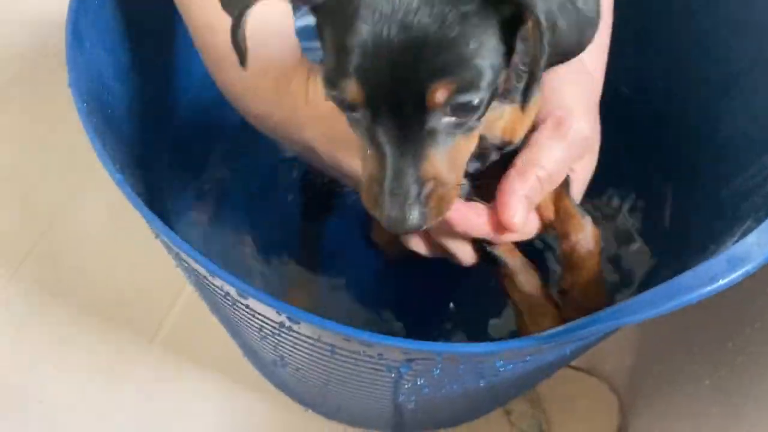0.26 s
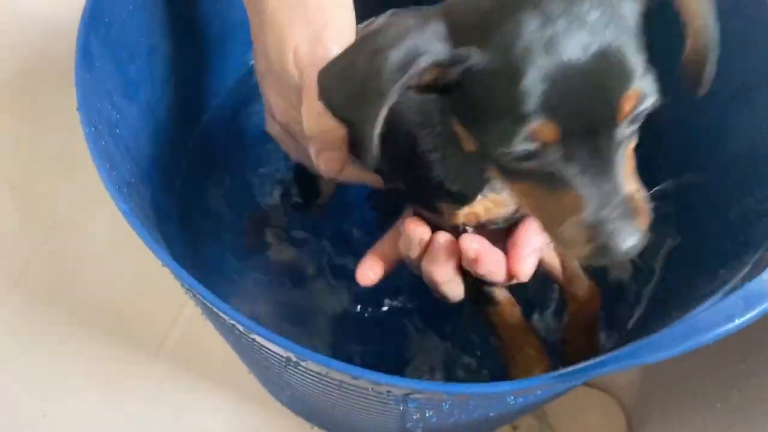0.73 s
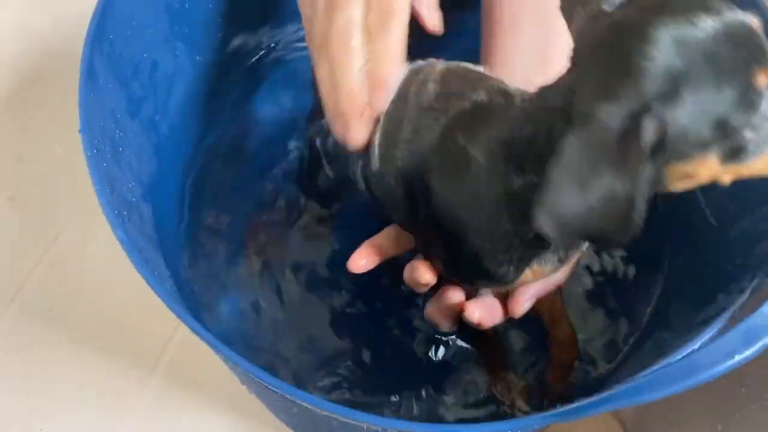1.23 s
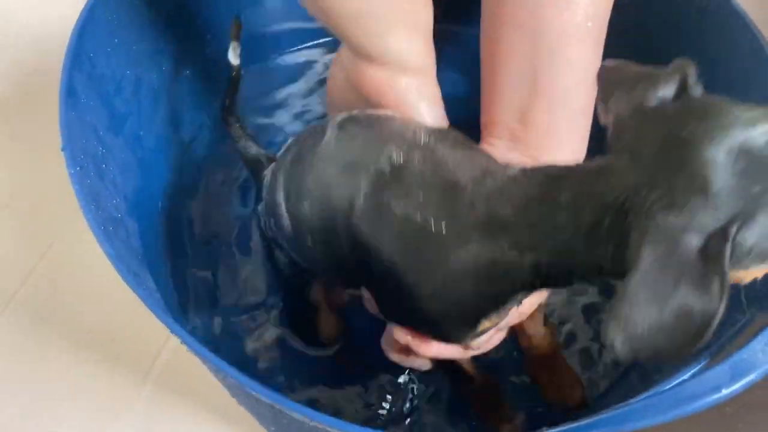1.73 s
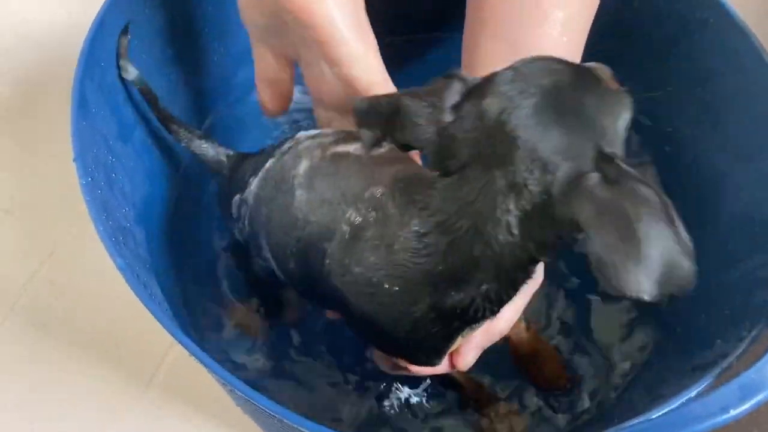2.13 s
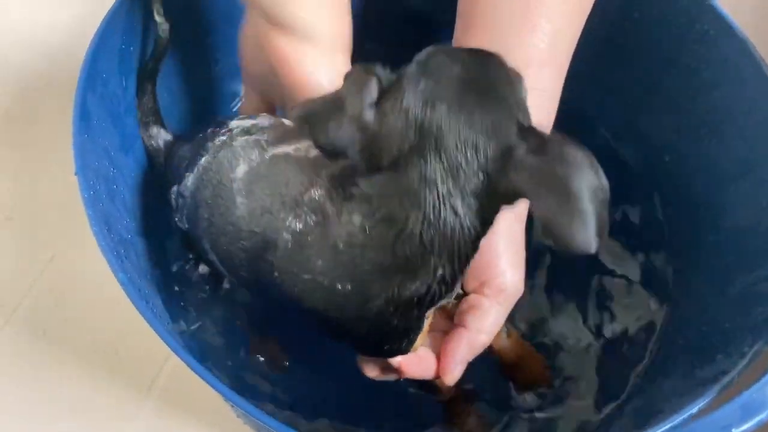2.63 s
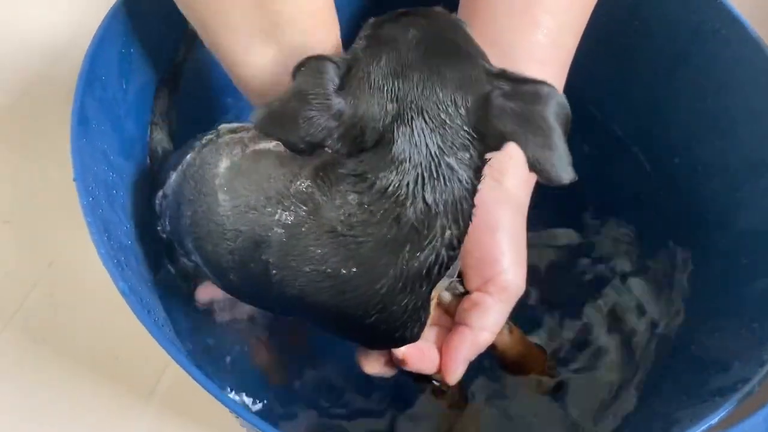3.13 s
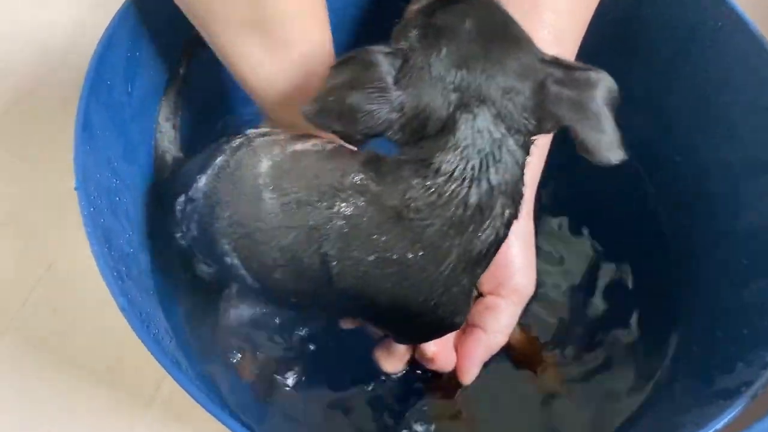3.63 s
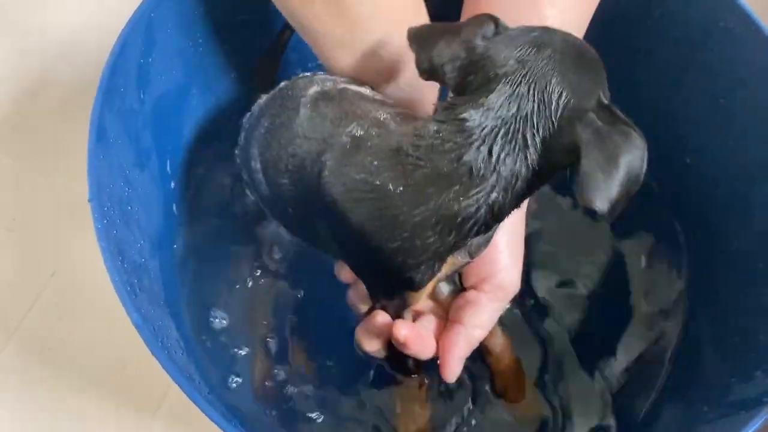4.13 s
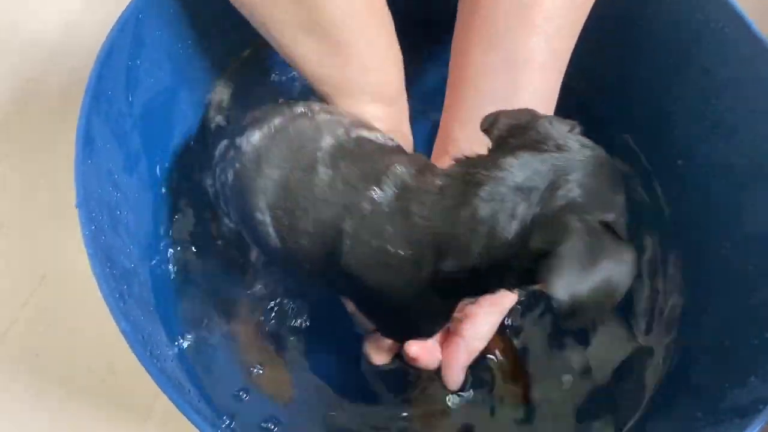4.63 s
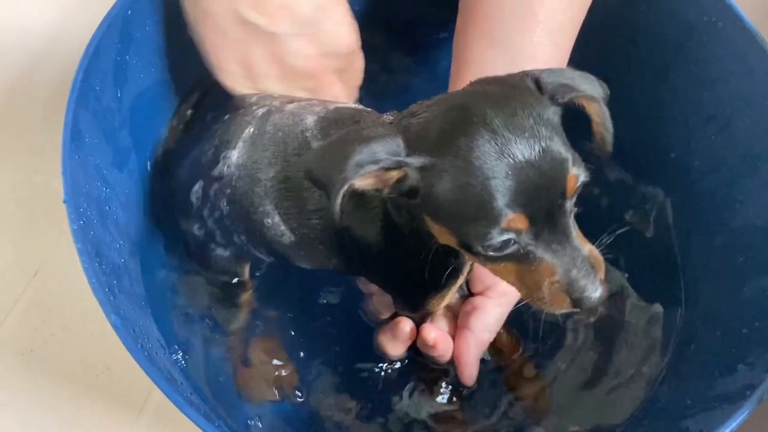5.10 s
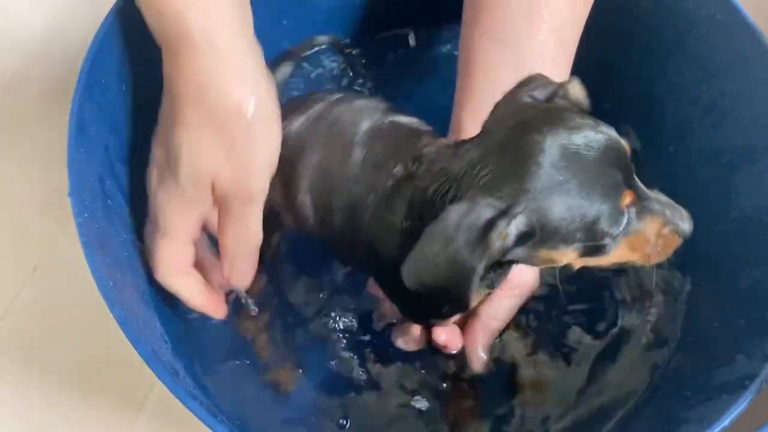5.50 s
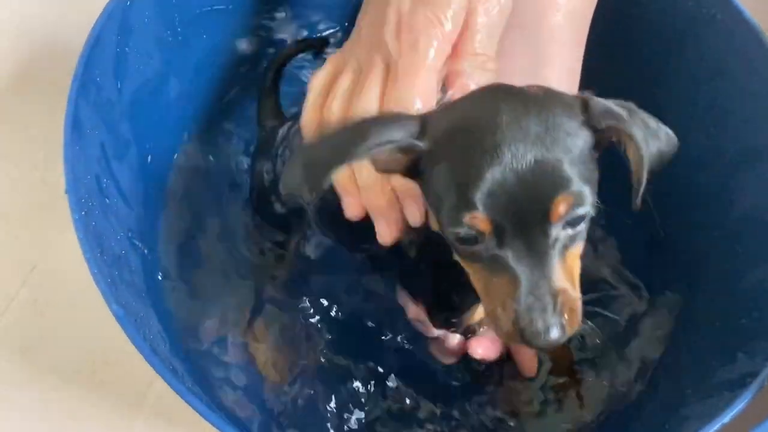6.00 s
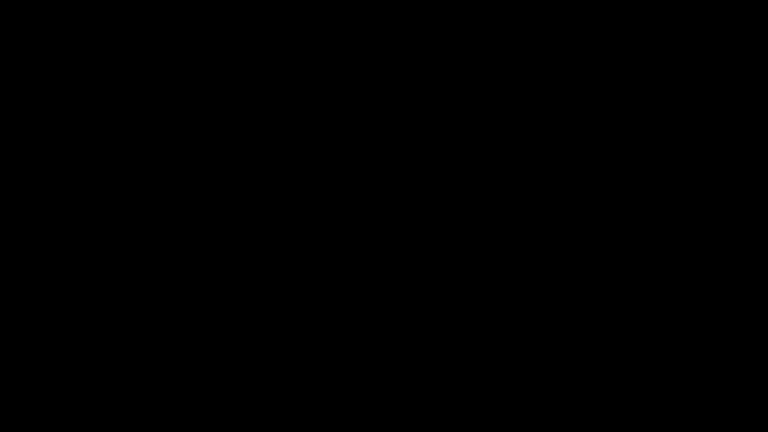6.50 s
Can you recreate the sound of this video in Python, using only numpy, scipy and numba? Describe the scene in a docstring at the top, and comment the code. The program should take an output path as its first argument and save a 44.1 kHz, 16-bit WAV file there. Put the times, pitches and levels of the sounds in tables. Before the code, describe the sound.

Close stereo sound of a small dog being hand-washed in a plastic tub in a small hard room. Soft sloshing and sparse little slaps come first, then a sharper splash midway, rubbing of wet fur, one plastic knock and a denser run of splashes and bubbling plops. A faint low hum lies beneath, and the sound cuts off abruptly.

```python
"""A small hard room: a small dog is washed by hand in a plastic tub of shallow water, heard close up.
Hands and paws slap the water as noise bursts with a froth of tones; trapped bubbles ring as gliding sines.
Swarms of tiny tones make the sloshing, the trickling and the crackle of wet fur; the tub takes one knock,
built from decaying modes. Filtered noise makes the tub wall boom softly as the water shifts.
A wavering mains hum and faint room noise lie underneath."""
import sys
import numpy as np
from scipy import signal
from scipy.fft import rfft, irfft, next_fast_len
from scipy.io import wavfile
from scipy.ndimage import uniform_filter1d
from numba import njit

SR = 44100
rng = np.random.default_rng(int(sys.argv[2]) if len(sys.argv) > 2 else 0)


def store_wav(level_fs):
    """Save 16-bit WAV to argv[1]."""
    pcm = np.round(np.clip(np.atleast_2d(level_fs), -1, 1) * 32767)
    wavfile.write(sys.argv[1], SR, pcm.T.astype(np.int16))


N = 297746
TIME = np.arange(N) / SR


def undb(db):
    """Decibels to gain."""
    return 10 ** (np.asarray(db) / 20)


def unit(x):
    """Scale to rms 1."""
    return x / np.sqrt(np.mean(x ** 2))


def colour(x, points):
    """Filter by a spectrum of (Hz, dB) points, joined over log frequency."""
    hz, db = np.transpose(points)
    size = next_fast_len(len(x))
    f = np.maximum(np.fft.rfftfreq(size, 1 / SR), 1)
    gain = undb(np.interp(np.log(f), np.log(hz), db))
    return irfft(rfft(x, size) * gain, size)[:len(x)]


def band(x, points):
    """Colour x, fall 40 dB in the octave beyond each end, and scale to rms 1."""
    (low, low_db), (high, high_db) = points[0], points[-1]
    return unit(colour(x, [(low / 2, low_db - 40), *points, (high * 2, high_db - 40)]))


def add(out, s, x):
    """Mix x into out from time s in seconds."""
    i = max(int(s * SR), 0)
    out[i:i + len(x)] += x[:max(N - i, 0)]


def walk(rate):
    """Slow random drift at rms 1, with a new target rate times a second."""
    k = int(SR / rate)
    steps = np.repeat(rng.standard_normal(N // k + 1), k)
    return unit(uniform_filter1d(steps, k)[:N])


def track(rows):
    """Join rows (s, value) by straight lines."""
    return np.interp(TIME, *np.transpose(rows))


def swells(rows, attack_s, release_s):
    """Gain over time for rows (s, length, dB): each rises, holds and dies away; overlaps add in power."""
    power, t = np.zeros(N), np.arange(2 * SR) / SR
    for s, length, db in rows:
        rise = np.minimum(t / attack_s, 1)
        fall = np.exp(-np.maximum(t - length, 0) / release_s)
        add(power, s, (undb(db) * rise * fall) ** 2)
    return np.sqrt(power)


@njit
def ring(length, start, hz, size, decay, rise):
    """Damped bubble tones whose pitch glides by rise octaves per s, climbing as they near the surface."""
    out = np.zeros(length)
    for k in range(len(start)):
        first, phase, gain, f = max(int(start[k] * SR), 0), 0., size[k], hz[k]
        fade, climb = np.exp(-1 / (decay[k] * SR)), 2 ** (rise[k] / SR)
        for i in range(first, min(first + int(5 * decay[k] * SR), length)):
            out[i] += gain * np.sin(phase) * min(phase / 5, 1.)
            phase += 2 * np.pi * f / SR
            f *= climb
            gain *= fade if f < 1.8 * hz[k] else .99  # it bursts on reaching the surface
    return out


def swarm(count, low_hz, high_hz, cycles, spread_db, wash):
    """Countless small bubbles of uneven size over a wash of ones too small to tell apart."""
    when, pitch, strength, length, glide = rng.random((count, 5)).T
    hz = low_hz * (high_hz / low_hz) ** pitch
    decay = cycles * (.5 + length) / hz
    size = undb(spread_db * np.minimum(-np.log(1 - strength), 4))  # many weak, few strong
    grains = ring(N, when * N / SR, hz, size, decay, 0.13 * glide / decay)
    return unit(grains) + wash * rng.standard_normal(N)


# Slaps of hands and paws on the water. Each row: start in seconds, splatter and ring level in dB,
# cavity pitch in Hz, spray level in dB; the levels are taken before the gains of slaps().
SLAPS = [(.109, -56, 5470, -64), (.165, -40, 1010, -63), (.439, -51, 2000, -58), (.516, -51, 640, -61),
         (.604, -45, 3920, -73), (.927, -26.5, 4230, -47), (.986, -39.5, 3840, -55), (1.04, -35, 2410, -59),
         (1.506, -38.5, 5700, -75), (1.703, -35, 7400, -51), (1.92, -35, 927, -57),
         (2.053, -43, 1230, -64.5), (2.084, -32.5, 1075, -78), (2.217, -45.5, 2370, -53.5),
         (2.292, -44.5, 1180, -66), (2.788, -39, 4750, -56.5), (3.079, -37, 1083, -47),
         (3.185, -30.5, 4300, -56), (3.259, -42.5, 600, -56.5), (3.452, -43, 1130, -50),
         (3.544, -40, 6660, -58), (3.582, -38, 2230, -54), (3.612, -22.5, 1167, -42.5),
         (3.627, -26, 2900, -55), (3.65, -27, 1600, -67), (3.681, -25, 5350, -46),
         (3.735, -41, 1080, -46.5), (3.778, -32.5, 1044, -58), (4.207, -50, 7350, -58),
         (4.498, -29.5, 893, -64), (4.672, -44, 2000, -49.5), (4.716, -31, 1253, -61),
         (4.765, -26, 1144, -65), (5.101, -28.5, 2720, -37), (5.153, -45.5, 4240, -31.5),
         (5.201, -44, 880, -42), (5.353, -34.5, 1980, -48.5), (5.384, -37, 2510, -51),
         (5.476, -25.5, 2330, -52), (5.652, -29, 4040, -61), (5.7, -31.5, 7900, -54),
         (5.838, -29.5, 1310, -48.5), (5.899, -40, 1690, -46), (6.019, -17, 3030, -29.5),
         (6.023, -20.5, 2920, -35), (6.046, -30.5, 844, -48), (6.11, -21.5, 1046, -33.5),
         (6.252, -29.5, 1750, -55.5), (6.315, -29.5, 4250, -48), (6.35, -26, 2160, -52),
         (6.422, -34.5, 3940, -50), (6.539, -22, 1277, -56)]
# Colour of the spray. Each row: frequency in Hz, gain in dB.
SPRAY_COLOUR = [(1500, -6.5), (3500, 0), (6000, -2.5), (11000, 3), (16000, 0)]
# the splatter is strongest at the cavity's pitch and falls away on both sides
BELOW_DB_PER_OCT, ABOVE_DB_PER_OCT = 13.5, 12.5
# small cavities close faster: the time shrinks with pitch by this power, relative to 1 kHz
CLOSING_POWER = .1


def slaps(attack_s=.0015, decay_s=0.0023, scatter_s=.004, cycles=2.9, froth_db=-5.0,
          splatter_db=-23.0, spray_db=-10.5, cavity_db=-3.5, cavity_cycles=4.7):
    """Each slap closes a cavity in a few milliseconds, rings it briefly and whips in a froth of tiny bubbles."""
    out, t = np.zeros(N), np.arange(2048) / SR
    lead = 128 / SR  # short silence ahead of each burst
    for s, db, cavity_hz, spray in SLAPS:
        age = np.maximum(t - lead, 0) * (cavity_hz / 1000) ** CLOSING_POWER
        push = (1 - np.exp(-age / attack_s)) ** 2 * np.exp(-age / decay_s)
        when, pitch, glide = rng.random(size=(3, 24))
        hz, late = 700 * 14 ** pitch, -np.log(1 - when)
        # bubbles born later are weaker
        strength = hz * np.exp(-late / 2)
        froth = ring(len(t), lead + scatter_s * late, hz, strength, cycles / hz, 40 * glide)
        burst = unit(rng.standard_normal(len(t)) * push) + undb(froth_db) * unit(froth)
        # slopes drawn out to four octaves on each side
        shape = [(cavity_hz / 16, -4 * BELOW_DB_PER_OCT), (cavity_hz, 0),
                 (cavity_hz * 16, -4 * ABOVE_DB_PER_OCT)]
        splatter = undb(db + splatter_db) * band(burst, shape)
        fine_spray = undb(spray + spray_db) * band(burst, SPRAY_COLOUR)
        add(out, s - lead - attack_s / 2, splatter + fine_spray)
    s, db, hz, _ = np.array(SLAPS, float).T.copy()
    cavities = ring(N, s + attack_s, hz, undb(db + cavity_db), cavity_cycles / hz, np.full(len(s), 5.0))
    return out + cavities


# Waves pushed up by hand and dog. Each row: start in seconds, length in seconds, slosh level in dB,
# trickle level in dB; the levels are taken before the gains of stirring().
WAVES = [(0.06, 0.028, -55.5, -85), (0.255, 0.064, -46, -63.5), (0.435, 0.053, -49, -62),
         (0.753, 0.031, -58.5, -59.5), (0.868, 0.081, -61.5, -64), (1.228, 0.26, -63.5, -73),
         (1.603, 0.056, -52.5, -77), (1.776, 0.098, -46, -57.5), (2.059, 0.062, -57, -62.5),
         (2.275, 0.039, -57.5, -64.5), (2.597, 0.11, -56.5, -65.5), (3.064, 0.075, -62, -81),
         (3.245, 0.025, -67, -74), (3.596, 0.073, -51, -50), (3.679, 0.12, -54, -64),
         (3.914, 0.025, -50.5, -57), (4.225, 0.073, -66, -102), (4.45, 0.086, -81, -63.5),
         (4.726, 0.11, -45, -53.5), (5.136, 0.073, -52, -56), (5.277, 0.076, -77, -57),
         (5.485, 0.036, -45.5, -53.5), (5.582, 0.17, -49.5, -55), (5.825, 0.027, -58.5, -39),
         (6.001, 0.14, -67, -47.5), (6.219, 0.12, -61, -51), (6.467, 0.053, -61.5, -55.5)]
WAVE_ATTACK_S, WAVE_RELEASE_S = 0.012, 0.027
# How restless the water is between waves. Each row: time in seconds, lapping level in dB
# before the gains of stirring().
LAPPING = [(0, -65.5), (.55, -63.5), (.7, -75.5), (1.15, -73), (1.6, -61.5), (2.02, -75), (2.4, -61),
           (2.75, -66), (2.93, -71.5), (3.1, -63), (3.55, -72), (4.0, -62.5), (4.17, -79.5), (4.37, -84),
           (4.62, -60), (5.0, -64.5), (5.8, -77), (6.0, -62.5), (6.55, -56)]
# Colours of the large and the small bubbles. Each row: frequency in Hz, gain in dB.
SLOSH_COLOUR = [(130, -7.5), (270, -12), (450, -3.5), (650, 4.5), (1100, -14.5), (2000, -6)]
TRICKLE_COLOUR = [(500, -2), (950, -8.5), (1600, 1.5), (3000, -0.5), (4500, -4), (8000, -9)]


def stirring(slosh_db=-2.0, trickle_db=-2.0, lap_slosh_db=-5.0, lap_trickle_db=-2.5):
    """Moving water: large bubbles slosh and small ones trickle, in waves over a gentle lapping."""
    slosh = swarm(count=1500, low_hz=200, high_hz=1300, cycles=2.8, spread_db=2.2, wash=.3)
    trickle = swarm(count=3000, low_hz=750, high_hz=4500, cycles=4.5, spread_db=2.6, wash=.5)
    s, length, deep_db, fine_db = np.transpose(WAVES)
    lapping = undb(track(LAPPING))
    deep_waves = swells(zip(s, length, deep_db + slosh_db), WAVE_ATTACK_S, WAVE_RELEASE_S)
    fine_waves = swells(zip(s, length, fine_db + trickle_db), WAVE_ATTACK_S, WAVE_RELEASE_S)
    deep = np.hypot(deep_waves, lapping * undb(lap_slosh_db))
    fine = np.hypot(fine_waves, lapping * undb(lap_trickle_db))
    return band(slosh, SLOSH_COLOUR) * deep + band(trickle, TRICKLE_COLOUR) * fine + drips(fine)


def drips(stir, gain_db=6.5, cycles=8.0, rise=7.0):
    """Stray drops fall all the time and ring bubbles, louder where the water is stirred."""
    when, pitch, strength, glide = rng.random((70, 4)).T
    hz = 700 * 4 ** pitch
    size = undb(gain_db) * (.5 + strength)
    return stir * ring(N, when * N / SR, hz, size, cycles / hz, 2 * rise * glide)


# Single ringing bubbles. Each row: start in seconds, starting pitch in Hz, level in dB before
# the gain of bubbles(), pitch rise in octaves per second.
BUBBLES = [(.313, 666, -42, 8), (.63, 2890, -47, 4), (.68, 1530, -47.5, -1.3), (.892, 648, -41, 0.5),
           (1.638, 276, -44, 6), (1.868, 840, -47, -5), (2.649, 320, -37, 5), (3.436, 1007, -46.5, 4),
           (3.705, 673, -35, 7.5), (3.803, 1160, -32.5, -5.5), (4.039, 980, -48, 6), (4.803, 700, -33, -2),
           (5.102, 1484, -37.5, 13), (5.153, 296, -39.5, -11.5), (5.175, 2240, -36.5, 6),
           (5.189, 791, -29, 6), (5.224, 1180, -44, 19), (5.3, 1258, -33.5, 3.5), (5.5, 2210, -29.5, 5.5),
           (5.6, 589, -30, 11.5), (5.661, 1092, -36.5, 10), (5.841, 1308, -28.5, 5.5),
           (5.868, 1663, -31.5, 0), (6.018, 857, -26.5, 3.5), (6.106, 3390, -30.5, 12.5),
           (6.216, 2140, -35.5, 15.5), (6.246, 535, -37, 8.5), (6.254, 1725, -34.5, 20),
           (6.491, 740, -24.5, 45)]


def bubbles(gain_db=-3.0):
    """The larger air pockets ring alone, each a damped tone that glides."""
    s, hz, db, rise = np.array(BUBBLES, float).T.copy()
    return ring(N, s, hz, undb(db + gain_db), ring_time(hz), rise)


# decay time of a 1 kHz bubble; it shortens with pitch by this power
BUBBLE_DECAY_S, BUBBLE_SHORTENING = 0.0098, .3


def ring_time(hz):
    """Small bubbles die sooner than large ones."""
    return BUBBLE_DECAY_S * (1000 / hz) ** BUBBLE_SHORTENING


# Strokes of the hand over wet fur. Each row: start in seconds, length in seconds, level in dB
# before the gain of wet_fur().
STROKES = [(0, 0.278, -68.5), (.41, 0.2, -65), (.71, 0.098, -66), (.91, 0.71, -67), (1.46, 0.09, -62),
           (1.67, 0.28, -69), (2.12, 0.23, -65.5), (2.35, 0.19, -65.5), (2.66, 0.29, -66.5),
           (2.74, 0.11, -63), (2.98, 0.53, -68), (3.59, 0.19, -62), (3.78, 0.88, -70.5), (4.67, 0.26, -60),
           (4.98, 0.56, -60.5), (5.13, 0.088, -65), (5.47, 0.47, -60), (5.82, 0.73, -53.5),
           (5.99, 0.088, -48.5)]
STROKE_ATTACK_S, STROKE_RELEASE_S = 0.023, 0.0088
# Colour of the popping water films. Each row: frequency in Hz, gain in dB.
CRACKLE_COLOUR = [(2000, -18.5), (4000, -5.5), (7000, -2), (10000, -1), (16000, -3.5)]


def wet_fur(gain_db=-2.0, patchy_db=2.5, snap_db=-8.0):
    """Water films pop between the hairs as the hand slides on in small jerks; now and then a larger one snaps."""
    pops = swarm(count=9000, low_hz=3000, high_hz=15000, cycles=2.4, spread_db=3.6, wash=.7)
    snaps = swarm(count=70, low_hz=4000, high_hz=14000, cycles=3.0, spread_db=1.8, wash=0)
    hand = swells(STROKES, STROKE_ATTACK_S, STROKE_RELEASE_S)
    jerks = undb(gain_db + patchy_db * walk(45))
    return (band(pops, CRACKLE_COLOUR) + undb(snap_db) * snaps) * hand * jerks


# An air pocket squelches under the hand. Each row: time in seconds, pitch in Hz, level in dB,
# both before the random roughening.
SQUELCH = [(1.778, 520, -59), (1.787, 608, -41), (1.801, 831, -43.5), (1.826, 882, -39.5),
           (1.841, 648, -55), (1.862, 376, -53), (1.894, 191, -59), (1.909, 170, -82)]


def squelch(rough=0.26):
    """A pocket of air shrinks and opens again, so its pitch arches; both pitch and level are rough."""
    s, hz, db = np.transpose(SQUELCH)
    pitch = np.interp(TIME, s, hz) * (1 + 0.036 * walk(300))
    phase = 2 * np.pi * np.cumsum(pitch) / SR
    level = (1 + rough * walk(500)) * undb(np.interp(TIME, s, db))
    return np.sin(phase) * level * (TIME > s[0]) * (TIME < s[-1])


# Ringing modes of the tub wall. Each row: frequency in Hz, level in dB relative to the knock,
# time to fall 60 dB in seconds.
TUB_MODES = [(62.3, -25, .6), (107.1, -18, 0.72), (253, -22.5, 0.55), (292, -20, 0.18), (409, -5.5, 0.14),
             (500, -5, 0.076), (429.8, -6.5, 0.26), (574, -18.5, 0.23), (1240, -4, 0.015),
             (1555, -8, 0.036), (2094, 5, 0.01), (2230, -12.5, .07), (2430, -10.5, 0.071), (2784, 3, 0.011),
             (4080, -2, 0.019)]
# start of the knock, and the gain its modes and crack share
KNOCK_S, KNOCK_DB = 5.475, -23.5


def knock(crack_db=-5.0, crack_s=0.0041, contact_s=0.00012):
    """A sharp crack as the tub is struck, while the plastic wall rings in decaying modes."""
    out, t = np.zeros(N), np.arange(SR // 2) / SR
    modes = np.zeros(len(t))
    for k, (hz, db, t60) in enumerate(TUB_MODES):
        # neighbouring modes swing in opposite directions
        modes += (-1) ** k * undb(db - 60 * t / t60) * np.sin(2 * np.pi * hz * t)
    crack_colour = [(400, -7), (2500, -28), (6000, 1), (15000, -12.0)]
    crack = band(rng.standard_normal(len(t)), crack_colour) * np.exp(-t / crack_s)
    contact = 1 - np.exp(-t / contact_s)
    add(out, KNOCK_S, undb(KNOCK_DB) * (modes + undb(crack_db) * crack) * contact)
    return out


# Shoves against the tub wall. Each row: start in seconds, length in seconds, level in dB.
SHOVES = [(.26, 0.064, -47), (1.33, 0.12, -55.5), (1.79, 0.13, -58.5), (2.29, 0.061, -49.5),
          (3.66, 0.22, -57.5), (3.92, .05, -50.5), (4.8, 0.1, -53), (5.47, 0.13, -52), (5.68, 0.1, -52)]
SHOVE_ATTACK_S, SHOVE_RELEASE_S = 0.0067, 0.039
# Colour of the booming wall. Each row: frequency in Hz, gain in dB.
BOOM_COLOUR = [(28, -14.5), (40, -17), (60, 1.5), (80, -2), (120, -9), (200, -23), (400, -24)]


def boom(gain_db=0.0, rest_db=-69.0):
    """The soft wall flexes with the shifting weight, most at each shove: low noise over a faint rest level."""
    shoves = swells(SHOVES, SHOVE_ATTACK_S, SHOVE_RELEASE_S) * undb(gain_db)
    flex = np.hypot(shoves, undb(rest_db))
    return band(rng.standard_normal(N), BOOM_COLOUR) * flex


def room(low_t60=0.35, high_t60=0.29):
    """Tail of the small hard room, whose treble dies first; unit energy."""
    t = np.arange(SR // 2) / SR
    low, high = rng.standard_normal((2, len(t)))
    low_colour = [(40, -11.5), (120, 9.5), (350, -0.5), (2800, 1.5), (7000, -5.5)]
    high_colour = [(2000, -17.0), (5500, -2.5), (16000, -11.0)]
    low = colour(low, low_colour) * undb(-60 * t / low_t60)
    high = colour(high, high_colour) * undb(-60 * t / high_t60)
    return unit((low + high) * (t > .004)) / np.sqrt(len(t))


# Colour of the room air. Each row: frequency in Hz, gain in dB.
AIR_COLOUR = [(28, -10), (50, -2.5), (110, -3.5), (170, -17.5), (400, -18.5), (1000, -31.5), (3000, -37),
              (8000, -35), (16000, -32)]
# centre pitch and level of the hum, and the level of the air
AIR_DB, HUM_HZ, HUM_DB = -64.5, 98.8, -61.5


def background(waver_hz=1.3, waver_db=1.5):
    """Faint room air as filtered noise, and the hum of an appliance as a sine of wavering pitch and level."""
    phase = 2 * np.pi * np.cumsum(HUM_HZ + waver_hz * walk(11)) / SR
    hum = np.sqrt(2) * np.sin(phase) * undb(HUM_DB + waver_db * walk(9.8))
    return hum + undb(AIR_DB) * band(rng.standard_normal(N), AIR_COLOUR)


# Reflections from the tub wall. Each row: delay in seconds, linear gain common to both microphones,
# linear gain of their difference before the width colour.
TUB_ECHOES = [(.00085, 0.11, 0.28), (.0016, -0.11, .15), (.0029, 0.15, -.14), (.0043, 0.0035, 0.32)]
# Colour of the sound that differs between the two microphones. Each row: frequency in Hz, gain in dB.
WIDTH_COLOUR = [(30, -16.5), (60, -5.5), (250, -8.5), (650, 1), (1500, -0.5), (5000, -2), (7500, -10),
                (16000, -34.5)]


def scene(room_db=-7.5, room_side_db=-7.5):
    """The water is heard directly, off the tub wall and through the room."""
    water = stirring() + wet_fur() + slaps() + bubbles() + squelch() + knock()
    flex = boom()
    mid_tail = undb(room_db) * signal.fftconvolve(water, room())[:N]
    mid = water + flex + mid_tail + background()
    side_tail = undb(room_side_db) * signal.fftconvolve(water + flex, room())[:N]
    side = side_tail + undb(AIR_DB) * band(rng.standard_normal(N), AIR_COLOUR)
    for delay, common, difference in TUB_ECHOES:
        add(mid, delay, common * water)
        add(side, delay, difference * water)
    side = colour(side, WIDTH_COLOUR)
    return np.array([mid + side, mid - side])


# Left microphone over right. Each row: frequency in Hz, level difference in dB.
BALANCE = [(100, 2.5), (5000, 2), (8000, 0)]
# the sound is silent from END_S on; a steep low-pass closes at TOP_HZ
END_S, TOP_HZ = 6.572, 16150


def record(dry):
    """The left microphone is a little louder and lags in the top treble; the sound stops just before the end."""
    f = np.fft.rfftfreq(N, 1 / SR)
    lag = np.exp(-2j * np.pi * np.maximum(f - 7000, 0) * .000238)  # 0.238 ms group delay above 7 kHz
    left = colour(irfft(rfft(dry[0]) * lag, N), [(hz, db / 2) for hz, db in BALANCE])
    right = colour(dry[1], [(hz, -db / 2) for hz, db in BALANCE])
    fade_out = np.clip((END_S - TIME) / .004, 0, 1)
    pair = np.array([left, right]) * fade_out
    return signal.sosfilt(signal.ellip(8, .2, 70, TOP_HZ, fs=SR, output="sos"), pair)


dry = scene()
out = record(dry)
store_wav(out)
```